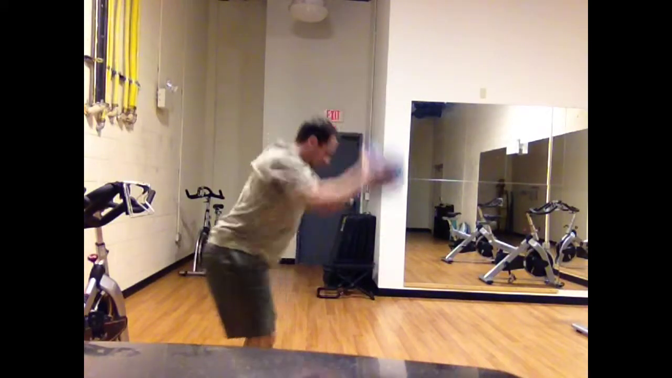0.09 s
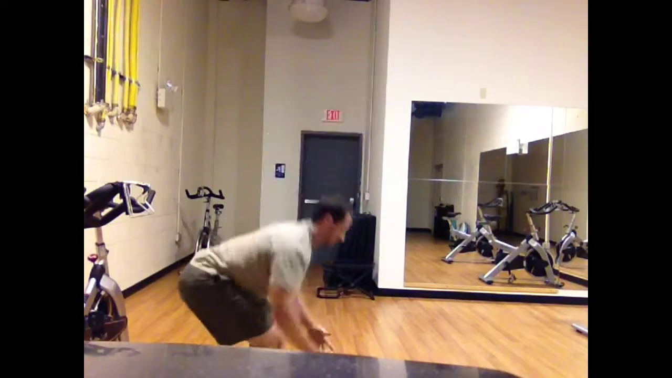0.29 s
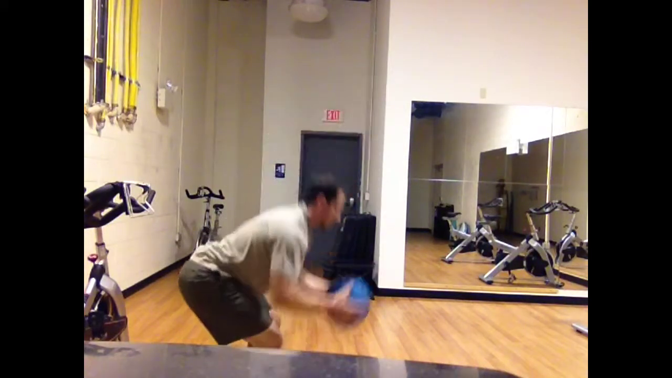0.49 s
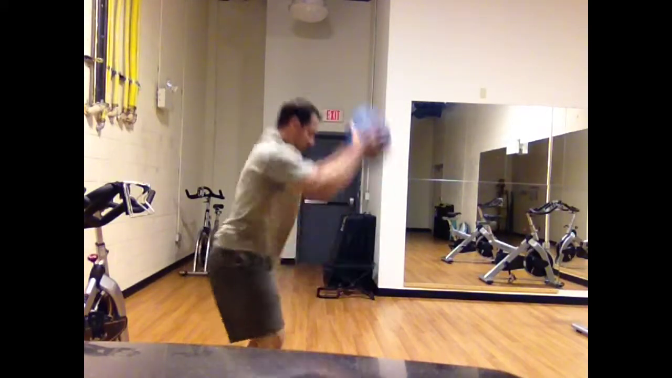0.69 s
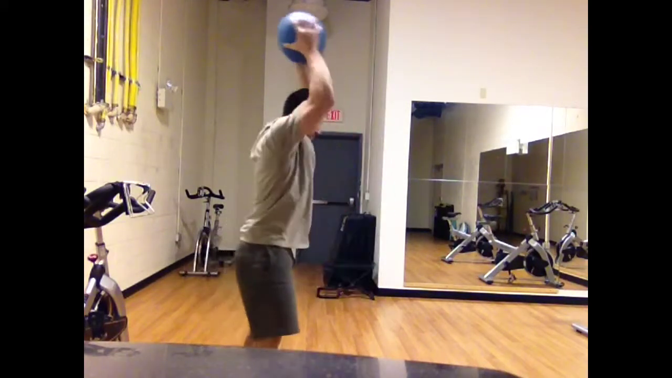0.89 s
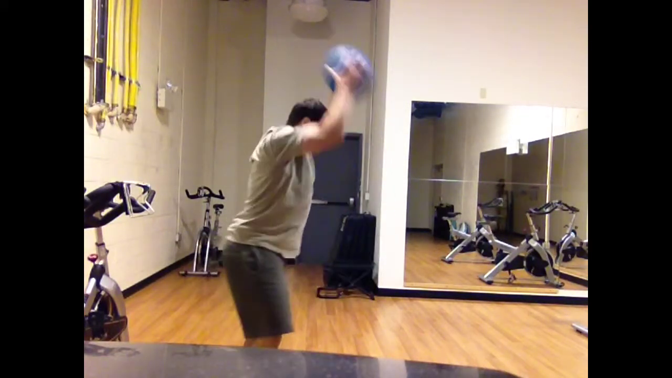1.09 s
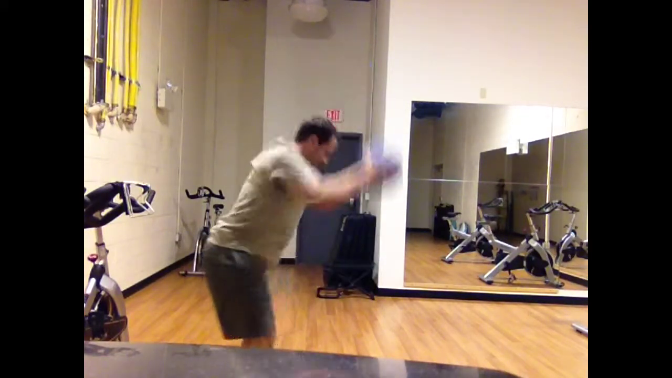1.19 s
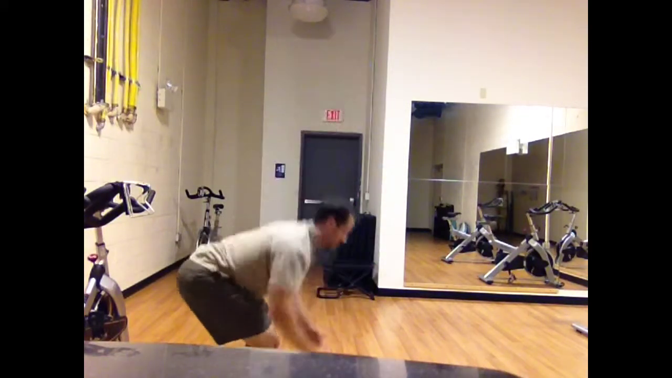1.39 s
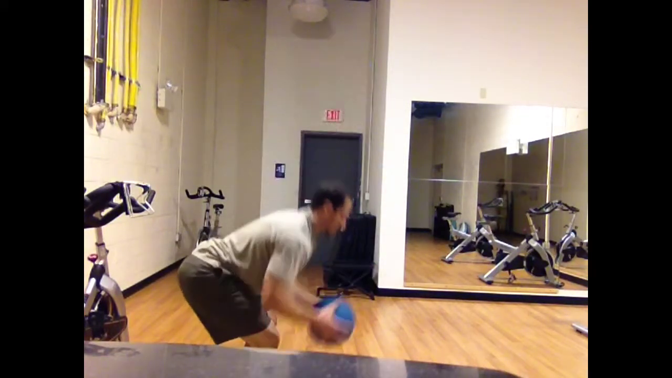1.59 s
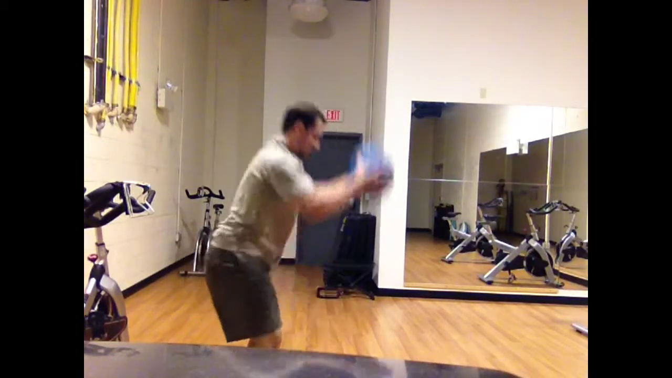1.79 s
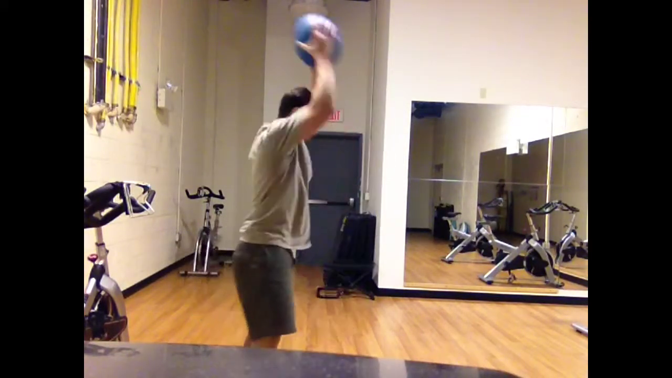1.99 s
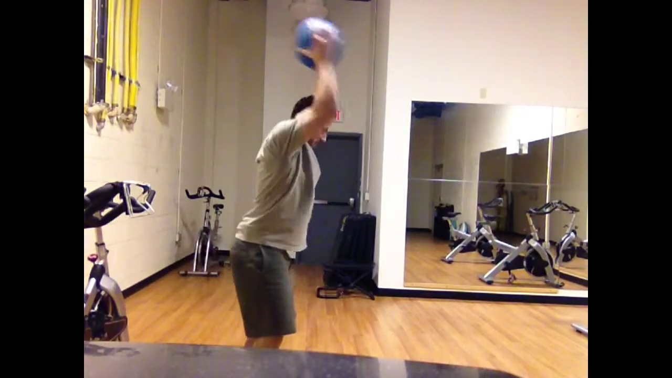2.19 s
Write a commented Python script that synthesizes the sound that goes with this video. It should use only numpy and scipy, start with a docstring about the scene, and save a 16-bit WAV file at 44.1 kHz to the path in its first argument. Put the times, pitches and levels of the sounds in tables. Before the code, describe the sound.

A heavy ball is slammed onto the wooden floor of a large gym. At the start, the hall is still ringing from an earlier slam. Sharp smacks with a slight hollow knock land at about 0.2 and 1.4 seconds, each just after a very faint swish of clothes. Each leaves a long echo that fades over a faint, steady ventilation hum.

```python
"""A heavy ball slammed onto the wooden floor of a large gym, twice, about a second apart.
A faint swish of clothes marks each throw. A tiny falling chirp runs ahead through the boards and
reaches the microphone just before the sharp crack of the ball's skin on the wood.
The walls throw the crack back and the hall rings for two seconds over a faint ventilation hum;
at the start it is still ringing from an earlier slam."""
import sys
import numpy as np
from scipy import signal
from scipy.fft import rfft, irfft, next_fast_len
from scipy.io import wavfile
from scipy.ndimage import uniform_filter1d

SR = 44100
rng = np.random.default_rng(int(sys.argv[2]) if len(sys.argv) > 2 else 0)


def int16_out(signal):
    """Quantize to a 16-bit WAV file."""
    q = np.round(np.clip(np.atleast_2d(signal).T, -1, 1) * 32767)
    wavfile.write(sys.argv[1], SR, q.astype(np.int16))


N = 97020


def amp(db):
    """Decibels to gain."""
    return 10 ** (np.asarray(db) / 20)


def read(points, hz, column=1):
    """One column of a table, interpolated on a log-frequency axis."""
    table = np.array(points)
    return np.interp(np.log(hz + 1), np.log(table[:, 0] + 1), table[:, column])


def add(mix, start_s, sound):
    """Mixes a sound in at start_s, which may be negative."""
    at = int(round(start_s * SR))
    sound = sound[max(-at, 0):]
    part = mix[max(at, 0):][:len(sound)]
    part += sound[:len(part)]


def colour(x, db_of):
    """Minimum-phase filter with the gain db_of(Hz), so nothing sounds ahead of an attack."""
    size = 2 * next_fast_len(len(x), True)
    gain_db = np.maximum(db_of(np.fft.rfftfreq(size, 1 / SR)), -100)
    cepstrum = irfft(np.log(amp(gain_db)))
    cepstrum[1:size // 2] *= 2
    cepstrum[size // 2 + 1:] = 0
    return irfft(rfft(x, size) * np.exp(rfft(cepstrum)))[:len(x)]


def ventilation():
    """The gym's room tone: soft steady air noise and a faint hum that swells briefly between slams."""
    # Each row: frequency in Hz, relative level of the air noise in dB.
    air_spectrum = [(25, -38), (55, -16), (110, -8), (200, 1.5), (300, -3), (600, -7), (1500, -18),
                    (3000, -24.5), (6000, -29), (9000, -36.5), (10500, -43.5), (15000, -39.5)]
    # Each row: pitch in Hz, RMS level in dB outside the swell.
    hum_tones = [(145.3, -72.5), (204.6, -67.5), (360.7, -70.5)]
    air_db, swell_db, swell_at_s, swell_width_s = -57.5, 4, 1.13, 0.16
    t = np.arange(N) / SR
    air_gain = amp(read(air_spectrum, np.fft.rfftfreq(N, 1 / SR)))
    air = irfft(rfft(rng.standard_normal(N)) * air_gain, N)
    hum = sum(amp(db) * np.sqrt(2) * np.sin(2 * np.pi * (hz * t + rng.random())) for hz, db in hum_tones)
    swell = amp(swell_db * np.exp(-((t - swell_at_s) / swell_width_s) ** 2))
    return amp(air_db) * air / air.std() + swell * hum


def diffuse(size):
    """Dense reflections from all round the gym: unit-power noise, evened out across the spectrum."""
    spectrum = rfft(rng.standard_normal(size))
    spectrum /= np.sqrt(uniform_filter1d(abs(spectrum) ** 2, 30 * size // SR))  # over 30 Hz
    return irfft(spectrum, size) * np.sqrt(size)


def hall(t, reflections):
    """Reflections build up, the far end of the hall fills late, and each band dies at its own speed."""
    # Each row: frequency in Hz, relative level in dB, seconds to fall by 60 dB.
    reverb = [(30, -42, 0.87), (73.7, -25, 1.1), (124, -13, 0.9), (200, -16, 1.27), (316, -11, 0.52),
              (509, -6.5, 1.58), (840, -0.5, 2), (1296, 0, 2.15), (1574, -4.5, 2.02), (2130, -6.5, 1.74),
              (3310, -6, 1.268), (4940, -4.5, 0.84), (5800, -12, 0.79), (8050, -14.5, 0.56),
              (10900, -24, 0.46), (15000, -27, 0.35)]
    # Each row: centre of a resonance in Hz, width in Hz, boost or cut in dB.
    resonances = [(117.5, 9.1, 8.5), (171.7, 17, 6.5), (227.1, 8.1, 11), (238, 5.7, -1.5),
                  (251.6, 10, 12.5), (384, 10.3, 5.5), (451, 5, 5), (517, 11, 4.5), (760, 52, 2.5),
                  (862, 16, 1.5), (920, 12, 0.5), (965, 6, 0.5), (1118, 12, 6), (1347, 25, 2.5),
                  (1480, 87, 2.5), (1660, 26, 6.5), (1787, 13, -1), (1865, 40, 2.5)]
    gain_db, build_s, late_fill_db, late_fill_s = 33, 0.0036, 6, 0.14
    hz, spectrum = np.fft.rfftfreq(len(t), 1 / SR), rfft(reflections)
    centres = np.geomspace(30, 16000, 28)
    tail = np.zeros(len(t))
    for centre, pick in zip(centres, np.eye(len(centres))):
        band = irfft(spectrum * np.interp(hz, centres, pick), len(t))
        tail += band * amp(-60 * t / read(reverb, centre, column=2))
    build = 1 - np.exp(-t / build_s)
    fill = amp(gain_db - late_fill_db * np.exp(-t / late_fill_s))
    tail *= build * fill / np.sqrt(SR / 10)

    def tone_db(f):
        peaks = sum(db / (1 + (2 * (f - mid) / width) ** 2) for mid, width, db in resonances)
        return read(reverb, f) + peaks
    return colour(tail, tone_db)


def swish(length_s=0.16, gain_db=-71):
    """Clothes hiss softly as the arms swing down."""
    # Each row: frequency in Hz, relative level in dB.
    cloth_spectrum = [(1000, -7), (3000, 0), (6000, 7.5), (9000, 1), (12000, 0), (15000, 3)]
    progress = np.arange(0, 1, 1 / (length_s * SR))
    hiss = rng.standard_normal(len(progress)) * np.sin(np.pi * progress)
    return colour(hiss, lambda hz: read(cloth_spectrum, hz) + gain_db)


def board_chirp(size=2048, gain_db=13):
    """Bending waves in the boards outrun the air above a critical pitch; the highest arrive first."""
    # Each row: frequency in Hz, relative level in dB.
    bending_spectrum = [(2500, -39), (4000, -3.5), (5000, 2.5), (6500, -8.5), (8500, -11), (11000, -26.5),
                        (15000, -33.5)]
    critical_hz, air_travel_s = 4200, 0.0034
    hz = np.fft.rfftfreq(size, 1 / SR)
    lead_s = air_travel_s * (1 - np.sqrt(critical_hz / np.maximum(hz, critical_hz)))
    phase = 2 * np.pi * np.cumsum(lead_s) * SR / size
    wave = amp(read(bending_spectrum, hz) + gain_db) * np.exp(1j * phase)
    return -np.fft.fftshift(irfft(wave))  # the airborne crack belongs at the midpoint


def crack(t, gain_db=10):
    """The ball's skin meets the wood: one short pressure pulse, straight to the microphone."""
    # Each row: frequency in Hz, relative level in dB.
    pulse_spectrum = [(40, -32.5), (200, -12), (420, -1.5), (1000, 3.5), (2000, 3.5), (3500, -4.5),
                      (5500, -7.5), (9000, -16.5), (15000, -16)]
    impulse = 1. * (t == 0)
    return -colour(impulse, lambda hz: read(pulse_spectrum, hz) + gain_db)


def scatter(t, t60_s=0.06, gain_db=11):
    """A brief dense rattle of reflections off the floor and the gear close to the impact."""
    # Each row: frequency in Hz, relative level in dB.
    rattle_spectrum = [(60, -11), (300, -2), (900, 5.5), (2200, -2), (4700, 4.5), (7000, -7), (10000, -19),
                       (15000, -24)]
    burst = rng.standard_normal(len(t)) * amp(-60 * t / t60_s)
    return colour(burst / np.linalg.norm(burst), lambda hz: read(rattle_spectrum, hz) + gain_db)


def boom_and_knock(t):
    """The floor booms low and the air inside the ball gives a hollow knock."""
    # Each row: pitch in Hz, relative starting level in dB, seconds to fall by 60 dB.
    modes = [(114.4, -43.5, 0.53), (785, -25, 0.18), (965, -25, 0.22), (1089, -25.5, 0.17)]
    return sum(amp(db - 60 * t / t60) * np.cos(2 * np.pi * hz * t) for hz, db, t60 in modes)


def treble_ripple(hz, depth_db=1.85, corner_hz=4540):
    """A fine random unevenness in dB: no two slams have quite the same treble colour."""
    grid_hz = np.arange(0, SR / 2, 10)
    wobble = uniform_filter1d(rng.standard_normal(len(grid_hz)), 11)  # bumps about 110 Hz wide
    treble = grid_hz ** 2 / (grid_hz ** 2 + corner_hz ** 2)
    ripple_db = depth_db * treble * wobble / wobble.std()
    return read(np.column_stack([grid_hz, ripple_db]), hz)


def scene():
    """One microphone in the gym. Every slam lands near the same spot, so the hall answers much alike."""
    # Each row: impact time in seconds, gain in dB, treble tilt in dB per octave, extra direct sound
    # in dB. Only the tail of the first slam is heard.
    slams = [(-0.91, 0.35, 0.5, 0), (0.2431, -0.15, 0.14, 0.5), (1.3570, -1.07, -0.87, 1.5)]
    # Each row: delay of a distinct reflection in seconds, gain in dB.
    echoes = [(.0027, -6), (.0166, -4), (.0285, -6)]
    swish_lead_s, tilt_from_hz, echo_dull_hz = 0.135, 2270, 12000
    hall_delay_s, hall_likeness = 0.016, 0.78
    out, t = ventilation(), np.arange(2 * SR) / SR
    shared = diffuse(len(t))
    direct = board_chirp()
    lead_s = len(direct) / 2 / SR
    add(direct, lead_s, crack(t))
    echo = colour(direct, lambda hz: -10 * np.log10(1 + (hz / echo_dull_hz) ** 2))
    for impact_s, db, tilt_db, direct_db in slams:
        add(out, impact_s - swish_lead_s, swish())
        slam = np.zeros(len(t))
        add(slam, 0, amp(direct_db) * direct)
        add(slam, lead_s, scatter(t) + boom_and_knock(t))
        for delay_s, echo_db in echoes:
            add(slam, delay_s, amp(echo_db) * echo)
        reflections = hall_likeness * shared + np.sqrt(1 - hall_likeness ** 2) * diffuse(len(t))
        add(slam, lead_s + hall_delay_s, hall(t, reflections))
        slam = colour(slam, lambda hz: db + treble_ripple(hz) + tilt_db * np.log2(1 + hz / tilt_from_hz))
        add(out, impact_s - lead_s, slam)
    return out[None]


def record(dry):
    """The microphone rounds off the highest peaks and thins the deep bass; the top treble is cut."""
    overload, low_cut_hz, high_cut_hz = 1.1, 48, 15300
    rounded = overload * np.tanh(dry / overload)
    thinned = signal.sosfilt(signal.butter(1, low_cut_hz, "high", fs=SR, output="sos"), rounded)
    band_limit = signal.firwin(401, high_cut_hz, window=("kaiser", 9), fs=SR)
    return signal.oaconvolve(thinned, band_limit[None], "same")


dry = scene()
out = record(dry)
int16_out(out)
```